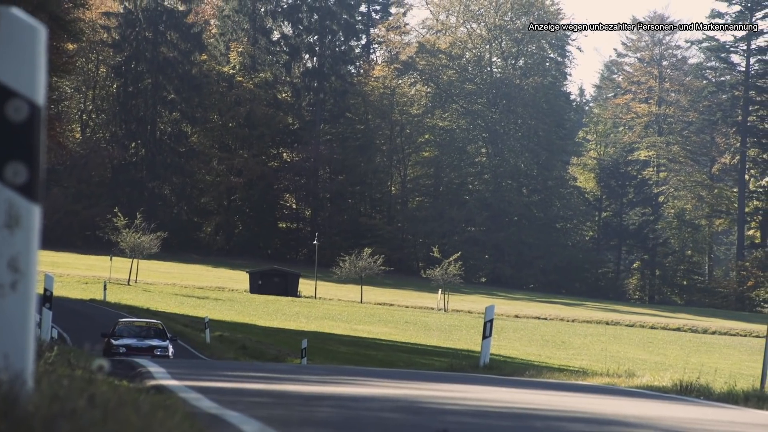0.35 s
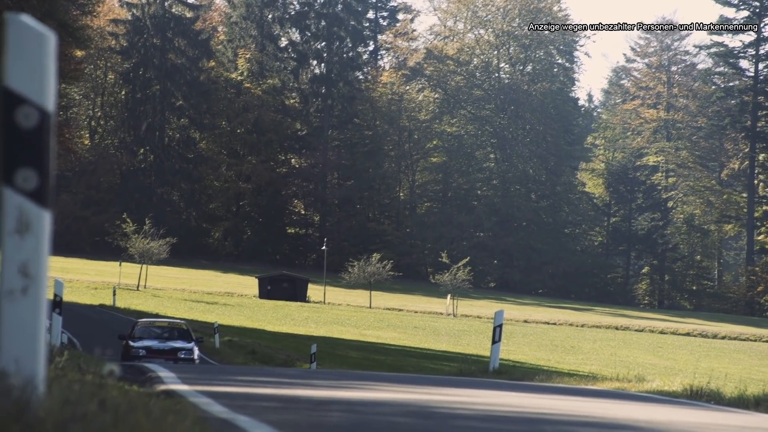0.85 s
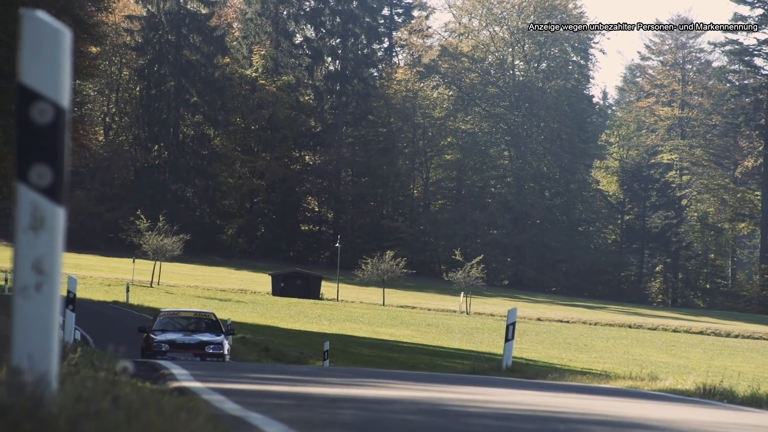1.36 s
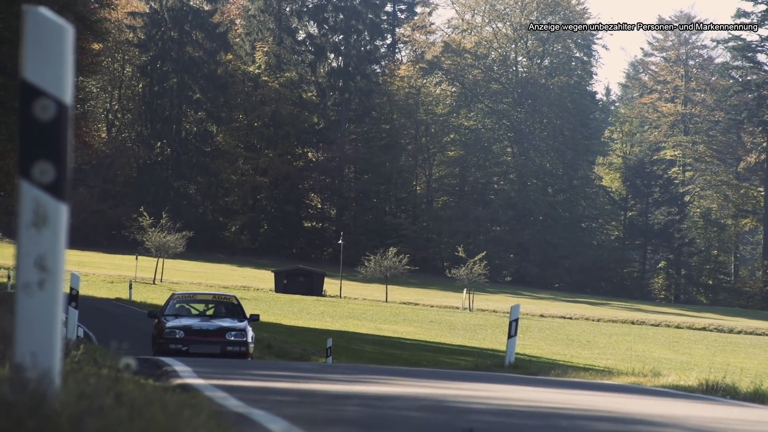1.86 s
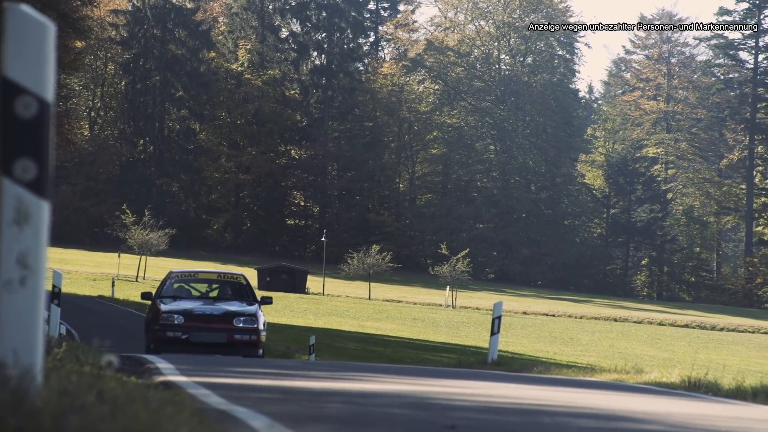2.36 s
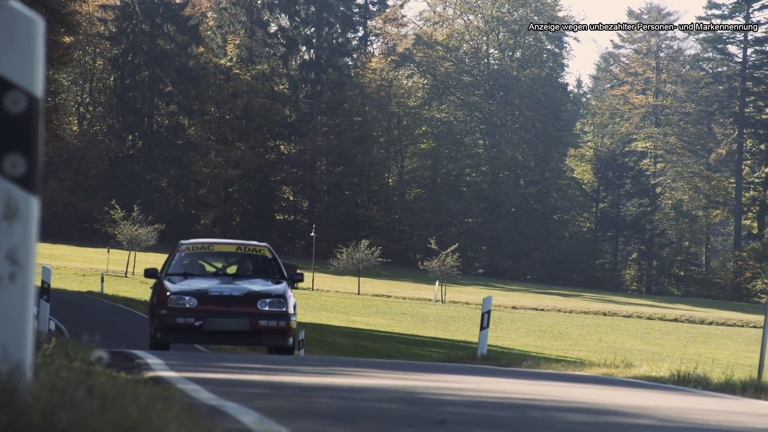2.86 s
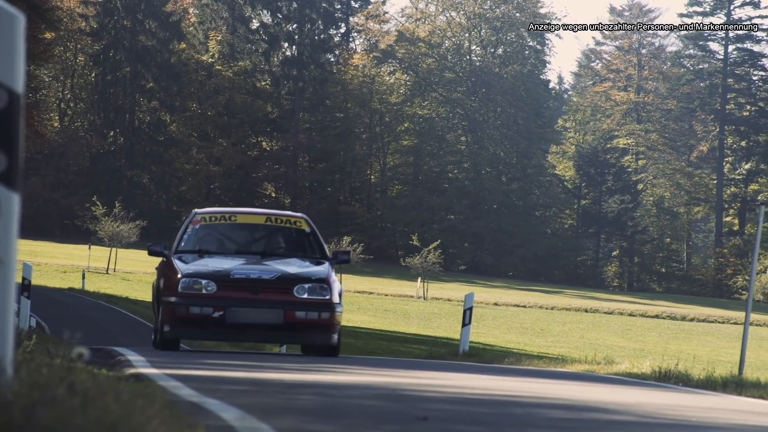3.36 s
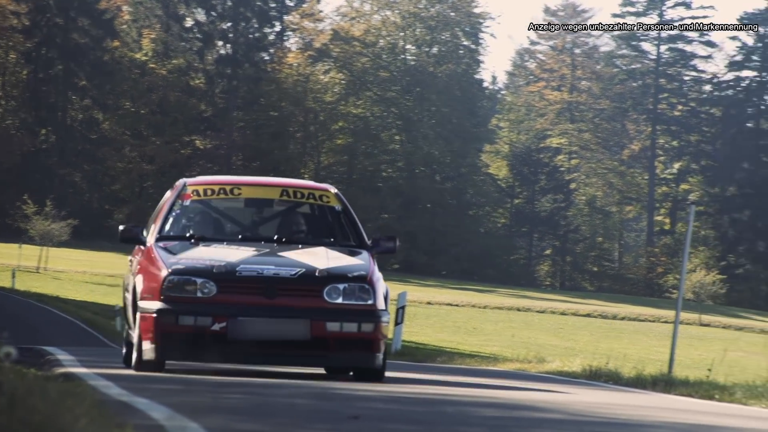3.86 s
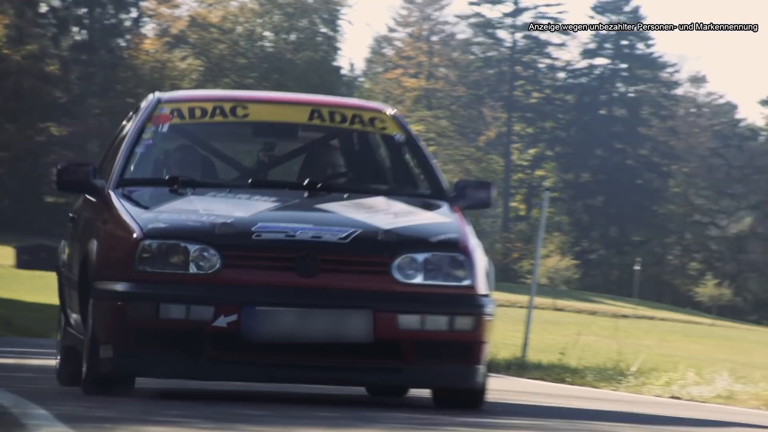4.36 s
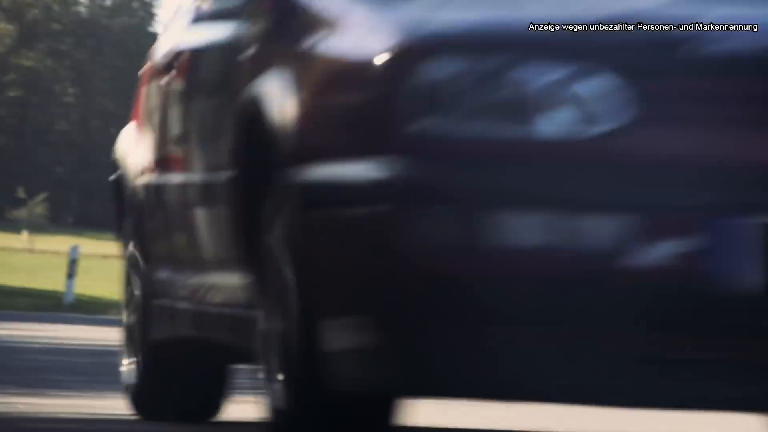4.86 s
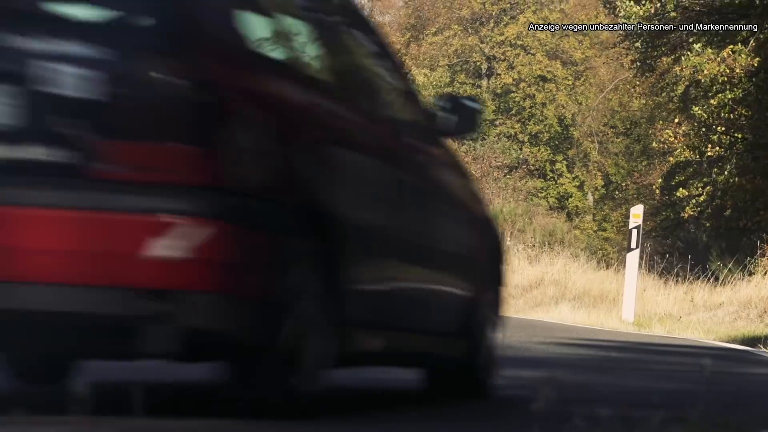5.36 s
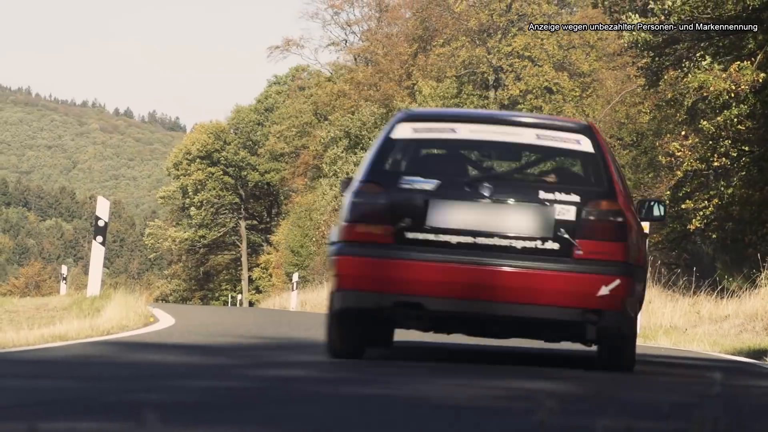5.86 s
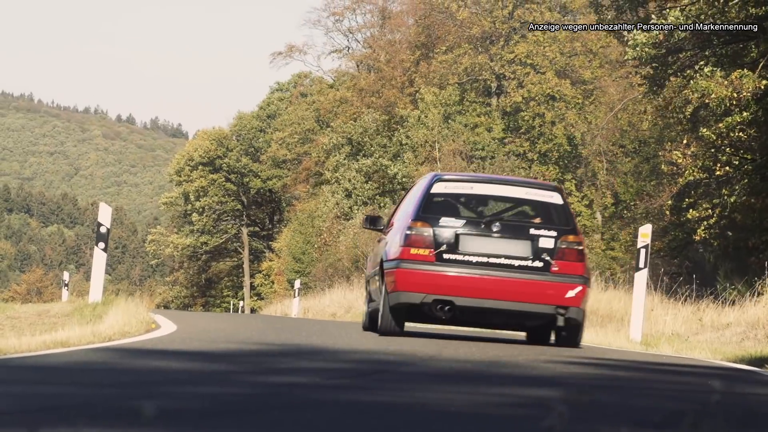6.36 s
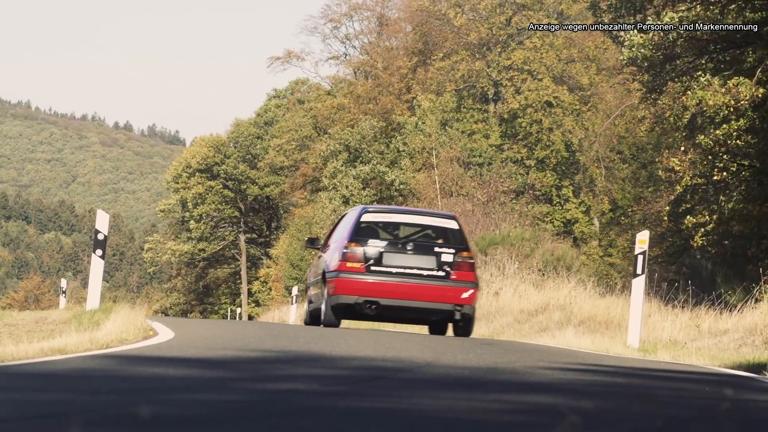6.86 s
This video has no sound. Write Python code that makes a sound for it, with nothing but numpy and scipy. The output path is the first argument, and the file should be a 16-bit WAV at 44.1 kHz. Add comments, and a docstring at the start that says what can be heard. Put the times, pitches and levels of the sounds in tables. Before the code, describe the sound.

A mono roadside microphone hears a distant engine humming, slowing and changing down to a higher, steady note. Tyre noise grows into a loud close pass with booming exhaust and bright grit hiss. Behind it, the drone sinks and fades, low gusts thump the microphone, a lighter road knock sounds and dry grass crackles briefly.

```python
"""A country road: a small car slows, changes down and climbs toward a roadside microphone, passes and draws away.
Engine, fan and exhaust are stacks of wavering sines; tyre roar, rumble, grit and air are coloured noise.
Its wake buffets the microphone with low noise and decaying swings; two jolts on the road ring the body
as decaying sines, and dry grass crackles in short bursts of bright noise."""
import sys
import numpy as np
from scipy import signal
from scipy.fft import rfft, irfft, next_fast_len
from scipy.io import wavfile
from scipy.ndimage import uniform_filter1d, map_coordinates

SR = 44100
rng = np.random.default_rng(int(sys.argv[2]) if len(sys.argv) > 2 else 0)


def pcm_store(signal):
    """Save signal as 16-bit PCM."""
    levels = np.round(np.clip(np.atleast_2d(signal), -1, 1) * 32767)
    wavfile.write(sys.argv[1], SR, levels.astype(np.int16).T)


def rack_gain(trim_db):
    """Turn a fader trim in dB into the linear factor to multiply a signal by."""
    fader = np.asarray(trim_db, float)
    return 10 ** (fader / 20)


N = 318919

# wheels over a road seam: (time [s], level [dB])
KNOCKS = [(5.131, -1.5), (6.728, -7.5), (6.743, -11)]
AIR_BAND_HZ = (5500, 16400)  # reference band of the air and grass spectra


def unit(x):
    """Scales x to rms 1."""
    return x / np.sqrt(np.mean(x ** 2) + 1e-20)


def curves(rows):
    """One value per sample for each column after the time."""
    time_s, *columns = np.transpose(rows)
    return [np.interp(np.arange(N) / SR, time_s, column) for column in columns]


def gate(start_s, end_s, fade_s):
    """Fully open from start to end, with linear ramps just outside."""
    t = np.arange(N) / SR
    opening = np.clip((t - start_s) / fade_s + 1, 0, 1)
    closing = np.clip((end_s - t) / fade_s + 1, 0, 1)
    return opening * closing


def bump(centre_s, width_s):
    """A bell of height 1 around a time."""
    return np.exp(-0.5 * ((np.arange(N) / SR - centre_s) / width_s) ** 2)


def share(aspect, reach):
    """Amplitude share of one aspect of the car, fading out over reach steps."""
    # where the car is heard from: (time [s], aspect [0 far ahead, 1 close ahead, 2 beside, 3 behind])
    heard_from = [(0, 0), (1.5, 0), (4.2, 1), (4.7, 1.1), (4.95, 1.5), (5.3, 2), (5.55, 3), (7.23, 3)]
    distance = abs(curves(heard_from)[0] - aspect)
    return np.sqrt(np.clip(1 - distance / reach, 0, 1))


def wobble(rate_hz):
    """A smooth random curve through rate_hz random knots a second."""
    knots = rng.standard_normal(int(N * rate_hz / SR) + 4)
    return map_coordinates(knots, [np.arange(N) * rate_hz / SR])


def coloured(x, spectrum, band_hz):
    """x through (Hz, dB) points read on a log axis, with rms 1 inside the band."""
    m = next_fast_len(N + 8192)
    f = np.fft.rfftfreq(m, 1 / SR)
    hz, db = np.transpose(spectrum)
    gain = rack_gain(np.interp(np.log(f + 1), np.log(hz + 1), db, -120, -120))
    in_band = (f > band_hz[0]) & (f < band_hz[1])
    inside = np.sum(gain[in_band] ** 2) / np.sum(gain ** 2)
    return unit(irfft(rfft(x, m) * gain, m)[:N]) / np.sqrt(inside)


def rush(spectrum, band_hz, patchy_db):
    """Coloured noise with time-frequency patches of random gain."""
    z = signal.stft(rng.standard_normal(N), nperseg=512)[2]
    field = uniform_filter1d(rng.standard_normal(z.shape), size=6, axis=0)
    field = uniform_filter1d(field, size=12, axis=1)
    patchy = signal.istft(z * rack_gain(patchy_db * unit(field)), nperseg=512)[1][:N]
    return coloured(patchy, spectrum, band_hz)


def grooves(x, depth_db, width_hz):
    """Many narrow random resonances of tyre grooves and panels."""
    m = next_fast_len(N + 8192)
    f = np.fft.rfftfreq(m, 1 / SR)
    ripple = map_coordinates(rng.standard_normal(4000), [np.clip(f / width_hz, 0, 3999)])
    gain = rack_gain(depth_db * ripple)
    return irfft(rfft(x, m) * gain / np.sqrt(np.mean(gain ** 2)), m)[:N]


def tone(hz, db, waver_db, drift_rad):
    """A sine of rms level db whose strength and phase wander a little."""
    phase = 2 * np.pi * (np.cumsum(hz) / SR + rng.random()) + drift_rad * wobble(14)
    return np.sqrt(2) * rack_gain(db + waver_db * wobble(9)) * np.sin(phase)


def engine():
    """Firing tone and crank orders locked to it; orders 1.5, 2 and 4 waver most."""
    # firing tone: (time [s], frequency [Hz], level [dB])
    firing = [(0, 110.5, -36), (1.05, 110.7, -34.5), (1.35, 92.4, -35), (1.64, 74.3, -38.5),
              (1.79, 80.5, -34), (1.95, 107.5, -37), (2.08, 129.1, -31), (2.18, 144, -38),
              (3.1, 141.3, -32.5), (3.6, 139, -30), (4.16, 138.4, -23), (4.5, 136.4, -16.5),
              (4.9, 135.4, -11.5), (5.08, 135, -14.5), (5.14, 134.4, -16.5), (5.2, 133.7, -16.5),
              (5.34, 132.7, -8.5), (5.42, 128.5, -11.5), (5.5, 125.3, -15.5), (5.6, 117.2, -12.5),
              (5.82, 111.2, -17.5), (5.9, 108, -24)]
    # (time [s], order 1.5 [dB re firing], order 2 [dB re firing], order 4 [dB re firing])
    upper = [(0, -20, -23, -29), (2.15, -21, -21, -29), (2.6, -16, -10, -25), (3.4, -12, -17, -19.5),
             (4.4, -22, -12.5, -25), (5.1, -11, -15, -31), (5.9, -24, -20.5, -46)]
    # weak orders: (multiple of firing rate, level [dB re firing])
    crank = [(.5, -35), (.75, -21.5), (3.75, -43)]
    hz, db = curves(firing)
    x = tone(hz, db, waver_db=1.0, drift_rad=0.13)
    for order, order_db in zip((1.5, 2, 4), curves(upper)):
        x = x + tone(order * hz, db + order_db, waver_db=2.0, drift_rad=0.25)
    for order, order_db in crank:
        x = x + tone(order * hz, db + order_db, waver_db=-1, drift_rad=0.23)
    return x * gate(0, firing[-1][0], fade_s=0.046)


def fan():
    """Blade tone of the cooling fan at the nose, shadowed by the body once the nose is past."""
    # (time [s], blade frequency [Hz], level [dB])
    blade = [(0, 290, -46.5), (1.5, 289.8, -42.5), (2, 290.5, -40.5), (3.6, 290.5, -31),
             (4.05, 286.2, -29.5), (5, 284.4, -22), (5.22, 280, -24.5)]
    return tone(*curves(blade), waver_db=1.05, drift_rad=0.15) * gate(0, blade[-1][0], fade_s=0.063)


def tyres():
    """Roar whose colour follows the car's aspect, road rumble, and a tread band on coarse road."""
    # roar, following how near the car is: (time [s], level [dB])
    roar_level = [(0.0, -45), (1.85, -43), (2.54, -40), (3.38, -36), (3.99, -30), (4.61, -22.5),
                  (4.81, -20.5), (4.95, -14.5), (5.13, -17), (5.28, -16.5), (5.36, -22.5), (5.82, -25.5),
                  (6.14, -29), (6.5, -27.5), (6.67, -30), (6.99, -39), (7.23, -40.5)]
    # roar from far ahead, dulled by air: (frequency [Hz], density [dB per Hz])
    far = [(380, -51), (480, -6), (750, -6.5), (830, -1), (900, -0.5), (1050, -4), (1200, -5), (1500, -6.5),
           (1800, -4.5), (2050, -6), (2700, -16.5), (3500, -17.5), (4300, -33), (5500, -50)]
    # roar from close ahead: (frequency [Hz], density [dB per Hz])
    front = [(380, -51), (480, -8), (750, -7.5), (830, -0.5), (900, 1), (1100, -1.5), (1250, -4),
             (1500, -3.5), (1750, 0), (2300, -6), (3300, -5), (3900, -11.5), (4400, -23.5), (5500, -42)]
    # roar from beside: (frequency [Hz], density [dB per Hz])
    side_on = [(380, -5), (480, -6), (650, -4), (750, -4), (900, -2.5), (1150, 2), (1500, -1.5),
               (1750, -5.5), (2300, -9), (3500, -9), (3900, -12.5), (4800, -28), (5500, -30)]
    # roar from behind: (frequency [Hz], density [dB per Hz])
    rear = [(380, -33), (480, -7.5), (700, -4.5), (870, -6.5), (1000, 0), (1200, 1.5), (1500, 0.5),
            (1750, -3), (2000, -7), (2700, -12.5), (3500, -13), (3900, -18), (4400, -28), (5500, -41)]
    # tread band: (frequency [Hz], density [dB per Hz])
    tread_colour = [(600, -29), (800, -4), (900, 1), (1100, 3.5), (1200, -18), (1500, -22)]
    # coarser stretch of road: (time [s], tread level [dB])
    tread_swell = [(0, -50), (.62, -48), (.85, -54.5), (1.4, -52), (1.83, -39), (1.87, -60), (7.23, -62)]
    # road rumble: (frequency [Hz], density [dB per Hz])
    rumble_colour = [(15, -5.5), (30, -10), (42, -3), (55, -2), (68, 11.5), (80, 14), (95, 6.5),
                     (125, 15.5), (160, 8), (250, 8.5), (320, 5), (400, -0.5), (480, -3), (600, -19)]

    roar_db, = curves(roar_level)
    roar = np.zeros(N)
    for aspect, colour in enumerate((far, front, side_on, rear)):
        face = grooves(rush(colour, (1200, 4200), patchy_db=0.5), depth_db=1.3, width_hz=28)
        roar = roar + share(aspect, reach=1) * face
    tread = rack_gain(curves(tread_swell)[0]) * rush(tread_colour, (800, 1150), patchy_db=1.5)

    # -31 dB at the loudest roar, before seams and drop; moves 0.69 dB per dB of roar
    rumble_db = -31 + 0.69 * (roar_db - roar_db.max())
    seam_db = sum(5 * bump(s, width_s=0.033) for s, _ in KNOCKS)
    # the rumble is softer beside and behind, leaving the exhaust note clear
    rumble_drop_db = 0.73 * share(2, reach=1) + 5.1 * share(3, reach=1)
    rumble_gain = rack_gain(rumble_db + seam_db - rumble_drop_db)
    rumble = rumble_gain * rush(rumble_colour, (310, 520), patchy_db=0.8)
    return rack_gain(roar_db) * roar + tread + rumble


def grit():
    """Loose grit under the tyres: brightest beside the microphone, burstier behind the wheels."""
    # hiss from close by: (frequency [Hz], density [dB per Hz])
    close_colour = [(4000, 6), (5200, 0.5), (7000, -5.5), (9000, -10), (12000, -13), (15000, -19),
                    (16400, -19)]
    # treble lost over distance: (frequency [Hz], gain [dB])
    air_loss = [(4000, -2), (9000, 1), (12000, -2), (16400, -15)]
    # hiss before bursts and sprays: (time [s], level [dB])
    hiss_level = [(0, -83), (1.8, -78.5), (3.1, -69), (4, -57), (4.8, -45), (4.93, -39.5), (5.26, -39.5),
                  (5.4, -46.5), (5.85, -55), (6.2, -58), (6.6, -60.5), (6.75, -64), (6.9, -69), (7.23, -74)]
    # brief swells: (time [s], level added [dB])
    sprays = [(5.48, 1), (5.62, 3.5), (5.94, 2.5), (6.34, 4), (6.54, 4)]
    band_hz = (6000, 16000)
    hz, db = np.transpose(close_colour)
    dull_colour = np.transpose([hz, db + np.interp(hz, *np.transpose(air_loss))])
    # the receding grit loses its last brightness
    near = share(2, reach=1.2) * gate(0, 5.5, fade_s=0.8)
    bright = near * rush(close_colour, band_hz, patchy_db=1.5)
    dull = np.sqrt(1 - near ** 2) * rush(dull_colour, band_hz, patchy_db=0.5)
    bursts_db = 0.59 * share(3, reach=1) * wobble(27) + 0.44 * wobble(60)
    sprays_db = sum(added_db * bump(s, width_s=0.047) for s, added_db in sprays)
    return rack_gain(curves(hiss_level)[0] + sprays_db) * rack_gain(bursts_db) * (bright + dull)


def background_air():
    """Still background hiss of patchy noise."""
    # (frequency [Hz], density [dB per Hz])
    air_colour = [(3500, -15), (5000, 3), (7000, -2.5), (12000, -4.5), (16400, -3.5)]
    return rack_gain(-72) * rush(air_colour, AIR_BAND_HZ, patchy_db=1.1)


def whine():
    """A faint, slowly rising sine high in the treble."""
    # (time [s], frequency [Hz], level [dB])
    whine_track = [(0, 13998, -88), (4.5, 14022, -88), (7.23, 14030, -88)]
    return tone(*curves(whine_track), waver_db=-1.0, drift_rad=0.2)


def wake():
    """Lumpy low buffeting, and gust blows on the capsule as quickly decaying swings."""
    # buffeting: (time [s], level [dB])
    wake_level = [(4.3, -59), (4.5, -36), (4.9, -23.5), (5.3, -34), (5.82, -42), (5.9, -22), (6.03, -25),
                  (6.12, -28), (6.46, -36), (6.54, -23.5), (6.68, -28.5), (6.88, -20), (7.05, -27),
                  (7.23, -26.5)]
    # buffeting: (frequency [Hz], density [dB per Hz])
    buffet_colour = [(12, -26), (22, -15), (30, -1), (40, 4), (75, 4), (100, 5.5), (130, 1), (200, -9),
                     (320, -23), (500, -32)]
    # single gusts: (time [s], level before swing shape [dB], swing frequency [Hz])
    gusts = [(5.898, -7, 112), (5.923, -4, 64.5), (6.015, -13, 56), (6.53, -10.5, 65.6), (6.66, -17, 55.1),
             (6.852, -12, 70.6), (6.879, 2, 66.5), (7.042, -7.5, 88), (7.147, -7, 78)]
    lumps = unit(rack_gain(2.1 * wobble(16))) * rush(buffet_colour, (22, 78), patchy_db=2.2)
    x = rack_gain(curves(wake_level)[0]) * lumps * gate(wake_level[0][0], N / SR, fade_s=0.18)
    x = np.pad(x, (0, SR))
    t = np.arange(SR // 10) / SR
    for s, db, hz in gusts:
        cycles = t * hz
        swing = np.sin(2 * np.pi * cycles) * cycles * np.exp(-2.1 * cycles)
        x[round(s * SR):][:len(t)] += rack_gain(db + 11.5) * swing
    return x[:N]


def exhaust():
    """Orders of the pulse rate in the pipe, whose pitch falls as the tail goes by."""
    # low orders, heard once the tail turns to the microphone:
    # (multiple of pulse rate, level [dB], full from [s], rise before that [dB per s])
    note = [(2, -22.5, 4.68, 120), (3, -26, 5.42, 150), (4, -22, 5.17, 60)]
    # further orders of the pulse rate, each sounding for a while:
    # (multiple of pulse rate, level [dB re order 4], from [s], to [s])
    pipe = [(1, -12, 6.1, 6.5), (5, -14, 5.55, 6.5), (6, -13, 5.5, 6.55), (7, -21, 5.55, 5.95),
            (8, -19, 5.45, 6.08), (10, -19, 5.75, 6.52), (12, -24, 6.05, 6.4), (13, -21, 6.15, 6.75),
            (14, -24, 6.05, 6.4), (16, -24, 5.98, 6.4)]
    end_hz, drop_hz, pass_s, pass_width_s = 45.17, 6.2, 4.9, 0.183
    boom_s, boom_rise_s, boom_fall_s, boom_db = 5.09, 0.13, 0.033, 12
    lift_s, lift_fade_s, lift_db = 6.46, 0.11, -13
    t = np.arange(N) / SR
    hz = end_hz + drop_hz / (1 + np.exp((t - pass_s) / pass_width_s))
    # the throttle lifts and the note sinks
    sink_db = lift_db * np.clip((t - lift_s) / lift_fade_s, 0, 1)
    levels_db = [db + sink_db + rise * np.minimum(t - full_s, 0) for _, db, full_s, rise in note]
    # order 2 booms beside the microphone, then drops quickly
    boom_width_s = np.where(t < boom_s, boom_rise_s, boom_fall_s)
    levels_db[0] = levels_db[0] + boom_db * bump(boom_s, boom_width_s)
    x = np.zeros(N)
    for row, db in zip(note, levels_db):
        x = x + tone(round(row[0]) * hz, db, waver_db=0.56, drift_rad=0.087)
    order_4_db = levels_db[2]
    for order, db, start_s, end_s in pipe:
        further = tone(order * hz, order_4_db + db, waver_db=1.7, drift_rad=0.082)
        x = x + gate(start_s, end_s, fade_s=0.042) * further
    return x


def knocks():
    """Each jolt rings the body shell as a few decaying sines."""
    # body modes: (frequency [Hz], level [dB re knock], 60 dB decay time [s])
    body = [(175, -1, 0.085), (304, -12, 0.03), (593, -9, 0.035), (696, -15, 0.041)]
    x = np.zeros(N + SR)
    t = np.arange(SR // 5) / SR
    onset = 1 - np.exp(-t / 0.0011)
    for s, db in KNOCKS:
        ring = sum(rack_gain(mode_db - 60 * t / t60_s) * np.sin(2 * np.pi * hz * t) for hz, mode_db, t60_s in body)
        x[round(s * SR):][:len(t)] += rack_gain(db) * ring * onset
    return x[:N]


def grass():
    """Dry grass snaps: short crackling bursts of bright noise."""
    # (start [s], level at mid-burst before smoothing [dB], length [s])
    snaps = [(6.034, -46, 0.013), (6.04, -53, 0.0055), (6.781, -43.5, .005), (6.854, -50, .003),
             (6.971, -54, .004), (7.026, -53, .008), (7.038, -52, 0.0018), (7.055, -43, 0.0098),
             (7.071, -61, .008)]
    colour = [(2500, -4), (4500, 9), (9000, -1), (13000, -5), (16400, -9)]  # (Hz, dB per Hz)
    t = np.arange(N) / SR
    shape = np.zeros(N)
    for s, db, length_s in snaps:
        off_centre = np.clip(abs(2 * (t - s) / length_s - 1), 0, 1)
        shape += rack_gain(db - 8 * off_centre) * ((t > s) & (t < s + length_s))
    crackle = rack_gain(2.4 * wobble(600)) * coloured(rng.standard_normal(N), colour, AIR_BAND_HZ)
    return uniform_filter1d(shape, size=20) * unit(crackle)


def scene():
    """Sums all sources into one channel."""
    car = engine() + fan() + tyres() + grit()
    background = background_air() + whine()
    passing = wake() + exhaust() + knocks() + grass()
    return (car + background + passing)[None]


def band_limit(x):
    """A steep low-pass at the top of the band."""
    return signal.sosfilt(signal.butter(12, 16360, fs=SR, output="sos"), x)


def record(dry):
    """The microphone loses the lowest bass, and the loudest peaks clip at full scale."""
    bass_cut = signal.butter(2, 16, "high", fs=SR, output="sos")  # 16 Hz
    mix = signal.sosfilt(bass_cut, dry)
    mix = mix / (1 + np.abs(mix) ** 24) ** (1 / 24)
    return band_limit(mix)


dry = scene()
out = record(dry)
pcm_store(out)
```